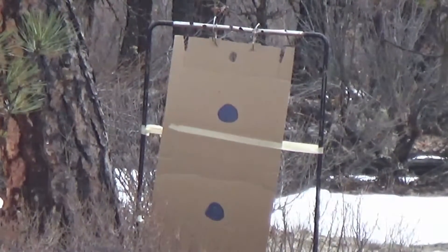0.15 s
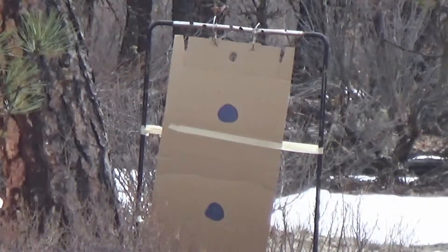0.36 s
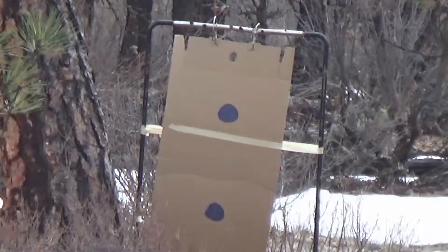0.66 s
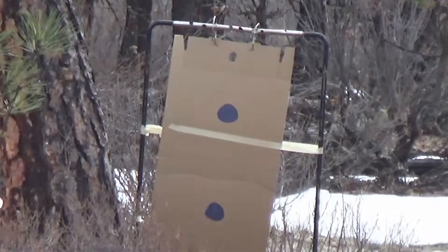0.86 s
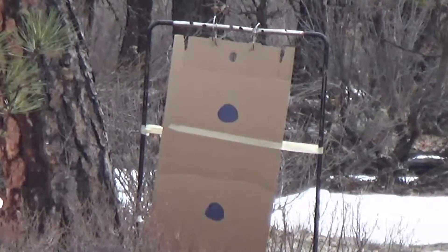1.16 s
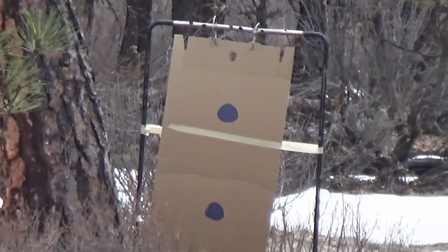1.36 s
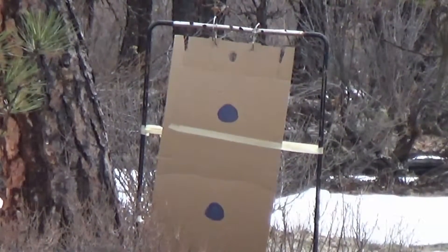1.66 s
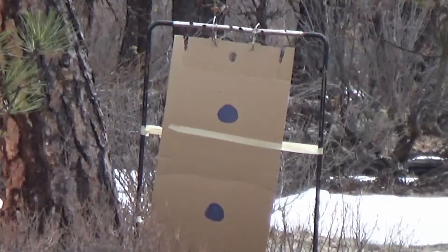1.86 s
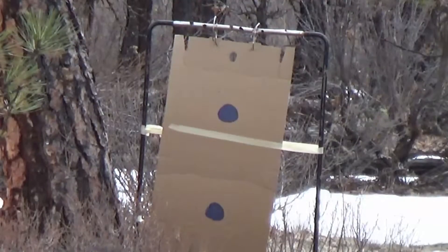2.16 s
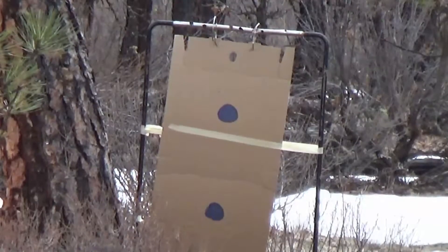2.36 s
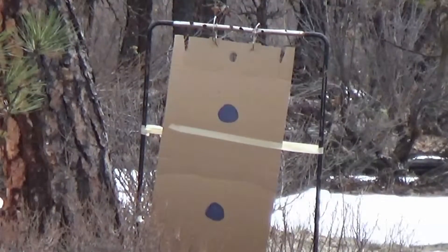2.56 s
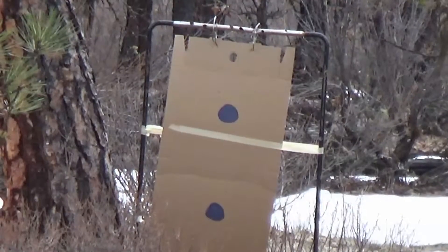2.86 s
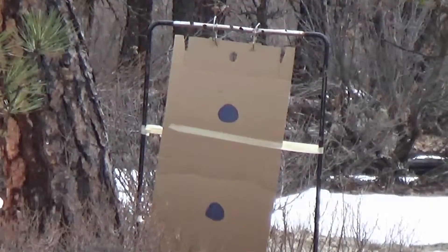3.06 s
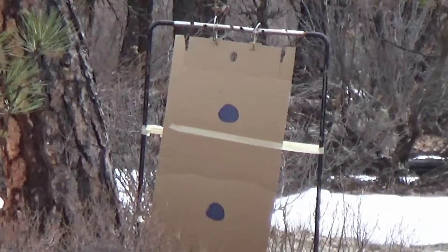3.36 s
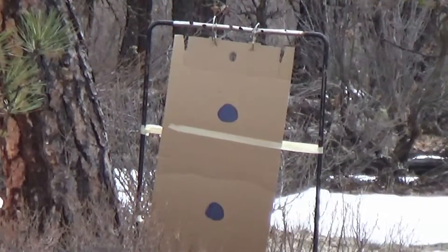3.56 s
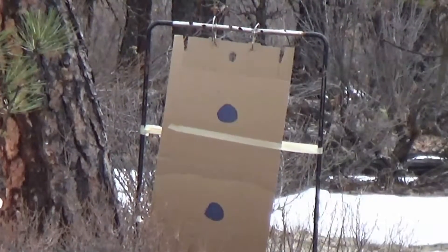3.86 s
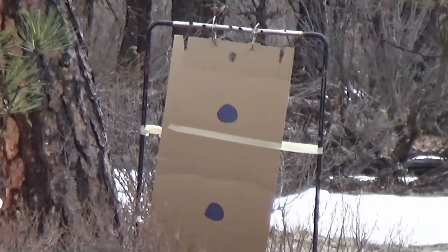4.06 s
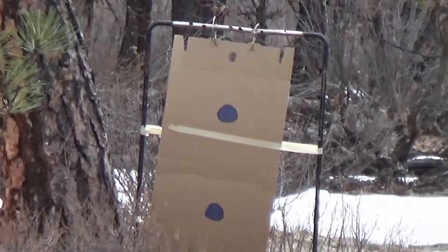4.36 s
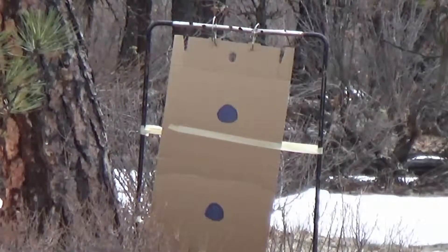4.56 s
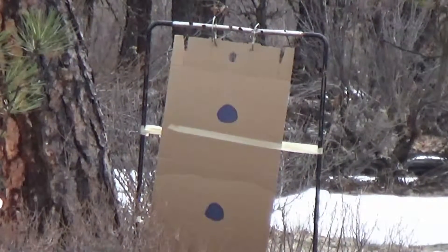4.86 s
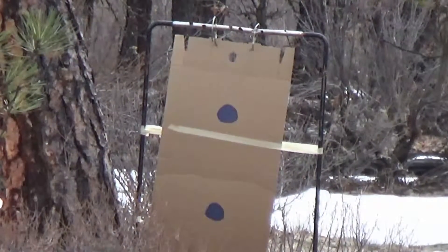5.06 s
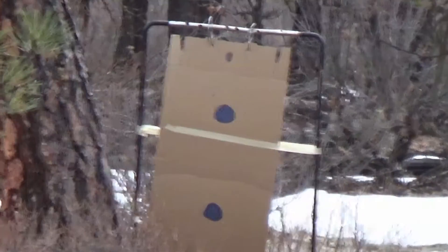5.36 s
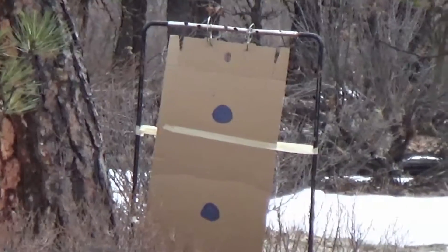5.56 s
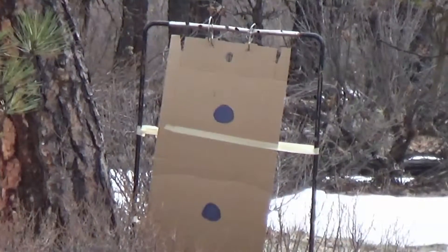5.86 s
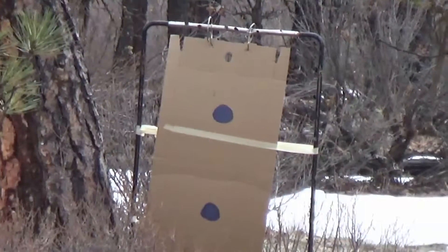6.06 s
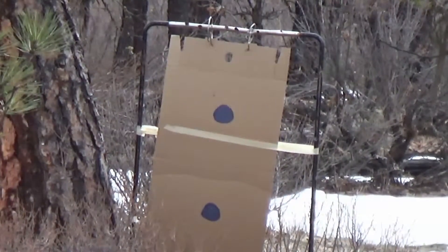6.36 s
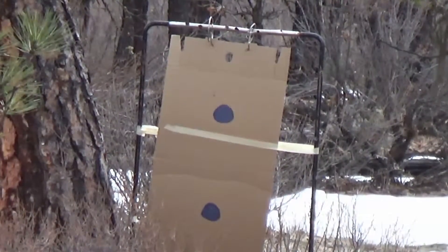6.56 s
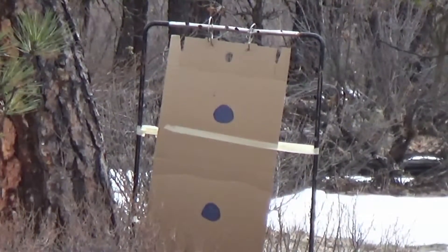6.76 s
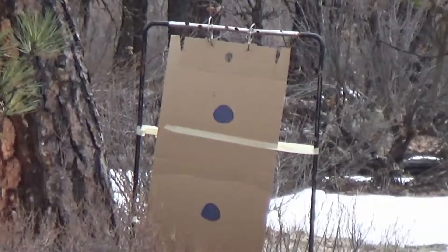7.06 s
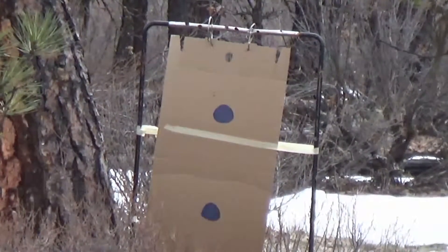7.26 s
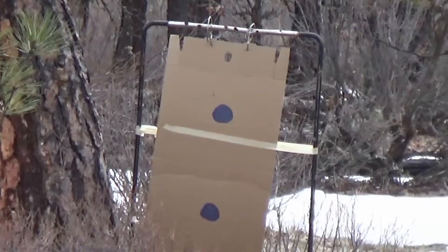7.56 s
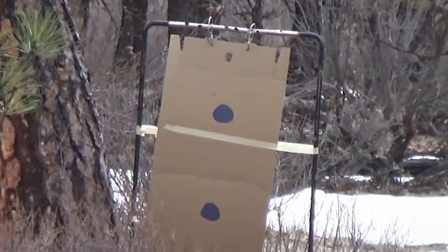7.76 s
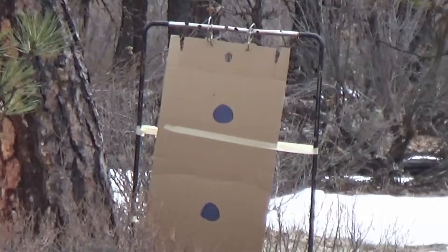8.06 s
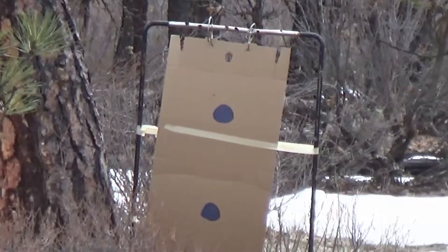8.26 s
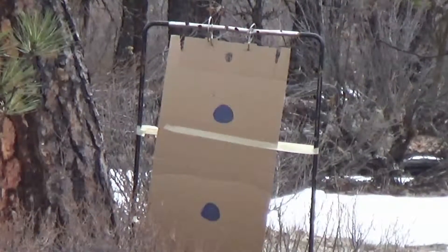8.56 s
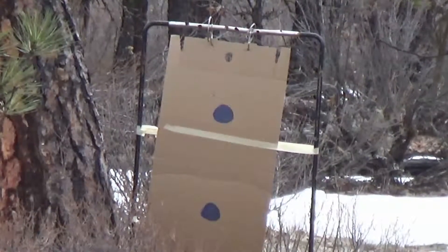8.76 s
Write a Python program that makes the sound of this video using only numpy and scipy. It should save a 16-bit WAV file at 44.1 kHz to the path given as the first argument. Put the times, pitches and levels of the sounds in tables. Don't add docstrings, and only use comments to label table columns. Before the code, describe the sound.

In a quiet snowy pine wood, the tail of a rifle shot fades. Close to the microphone, the stock bumps softly, then the bolt clacks open, scrapes back, throws a ringing brass case and slams shut. After a pause another shot cracks, held down by limiting, its echo rolling through trunks and distant slopes while the bolt is worked again.

```python
import sys
import numpy as np
from scipy import signal
from scipy.fft import rfft, irfft, next_fast_len
from scipy.io import wavfile
from scipy.ndimage import uniform_filter1d

SR = 44100
rng = np.random.default_rng(int(sys.argv[2]) if len(sys.argv) > 2 else 0)


def inscribe(sig):
    pcm = np.round(np.clip(np.atleast_2d(sig).T, -1, 1) * 32767)
    wavfile.write(sys.argv[1], SR, pcm.astype(np.int16))


def attenuation_scalar(level_db):
    decades = np.asarray(level_db, float) / 20
    return 10 ** decades


N = 393813
T = np.arange(N) / SR
STEP = 32
SLOW = T[::STEP]
LONG = next_fast_len(N + STEP, real=True)


def read(table, hz, column=1):
    table = np.array(table, float)
    return np.interp(np.log(hz), np.log(table[:, 0]), table[:, column])


def unit(x):
    return x / np.sqrt(np.mean(x ** 2))


def bell(hz, width):
    return lambda f: -np.minimum(12 * ((f - hz) / width) ** 2, 90)


def noise(db_of_hz, size):
    hz = np.maximum(np.fft.rfftfreq(size, 1 / SR), 1)
    return irfft(rfft(rng.standard_normal(size)) * attenuation_scalar(db_of_hz(hz)), size)


def band(hz, width):
    low, high = max(hz - 2 * width, 0), min(hz + 2 * width, SR / 2)
    bins = np.arange(int(low * LONG / SR), int(high * LONG / SR))
    spectrum = np.zeros(LONG // 2 + 1, complex)
    phases = rng.standard_normal((len(bins), 2)) @ [1, 1j]
    spectrum[bins] = attenuation_scalar(bell(hz, width)(bins * SR / LONG)) * phases
    return unit(irfft(spectrum, LONG)[:N])


def walk(rate):
    k = int(SR / STEP / rate)
    held = np.repeat(rng.standard_normal(len(SLOW) // k + 1), k)
    return uniform_filter1d(uniform_filter1d(held, k), k)[:len(SLOW)]


def bump(s, length):
    return np.exp(-((SLOW - s) / length) ** 2)


def fine(slow):
    return np.interp(T, SLOW, slow)


def add(out, sound, s):
    part = out[int(s * SR):][:len(sound)]
    part += sound[:len(part)]


def ring(t, hz, db, t60):
    return attenuation_scalar(db - 60 * t / t60) * np.sin(2 * np.pi * hz * t)


# t/s, level/dB
SHOTS = [
    (-2.15, 2.2),
    (5.386, 1.5),
]
# f/Hz, level/dB
WOOD = [(80, -77), (160, -45.5), (600, -28.5), (4000, -26), (6000, -36.5), (9000, -26.5), (12500, -25.5),
        (15500, -32)]
# delay/s, f/Hz, width/Hz, length/s, level/dB
BANKS = [(.41, 280, 230, .09, 8), (.34, 6000, 6000, .008, 6), (.27, 7000, 6000, .01, 4),
         (.02, 12000, 6000, .03, 3), (.36, 4200, 2000, .26, 5), (.55, 1700, 400, .12, 3),
         (.435, 3000, 2500, .012, 3.5), (.565, 3000, 3000, .015, 3)]
# f/Hz, level/dB
SLOPES = [(40, -100), (95, -61), (170, -60), (350, -44), (1400, -33), (2500, -33), (4600, -43), (5600, -72)]
BASS_LAG_S, PATCHY_DB = .008, 1.5
HOLD_S = .58
HELD_DB_S, BASS_BUILD_DB_S, BASS_HZ, AIR_DB_S_AT_6K = 4.0, 24, 240, 17
AFTER_DB_S, AFTER_BASS_DB_S, AFTER_BASS_HZ, AFTER_TREBLE_DB_S, AFTER_TREBLE_HZ = 38, 32, 450, 105, 4000
FAR_DB_S, FAR_AIR_DB_S_AT_1K = 10.5, 3.5


def echoes(hz, patch):
    start_db, far_db = read(WOOD, hz), read(SLOPES, hz)
    held_loss = HELD_DB_S - BASS_BUILD_DB_S / (1 + (hz / BASS_HZ) ** 2)
    held_loss += AIR_DB_S_AT_6K * (hz / 6000) ** 1.95
    near_loss = AFTER_DB_S + AFTER_BASS_DB_S / (1 + (hz / AFTER_BASS_HZ) ** 4)
    near_loss += AFTER_TREBLE_DB_S / (1 + (AFTER_TREBLE_HZ / hz) ** 2.5)
    far_loss = FAR_DB_S + FAR_AIR_DB_S_AT_1K * (hz / 1000) ** 1.9
    power = 0
    for s, db in SHOTS:
        age = np.maximum(SLOW - s, 0)
        late = np.maximum(age - HOLD_S, 0)
        banks = sum(g * np.exp(-((age - d) / l) ** 2 - ((hz - f) / w) ** 2) for d, f, w, l, g in BANKS)
        rise = 1 - np.exp(-age / (BASS_LAG_S * (500 / hz) ** .6))
        near = attenuation_scalar(start_db - held_loss * (age - late) - near_loss * late + banks)
        far = attenuation_scalar(far_db - far_loss * late)
        power = power + (near ** 2 + far ** 2) * (rise * attenuation_scalar(db)) ** 2
    return power * attenuation_scalar(PATCHY_DB * (patch + walk(15))) ** 2


# f/Hz, level/dB
WOOD_PAN = [(60, 1.5), (110, 2.5), (200, 2.5), (380, 2.0), (700, 2.0), (1290, 1.0), (2380, 0.0),
            (4400, 0.0), (8120, 0.0), (15000, 0.0)]
# f/Hz, level/dB
WOOD_SIDE = [(60, -10), (110, -10), (200, -10), (380, -9), (700, -7), (1290, -7), (2380, -11), (4400, -8),
             (8120, -11), (15000, -28)]
NARROWS_DB_S, NARROWS_HZ = 19, 5000
# f/Hz, level/dB per Hz
AIR = [(25, -32), (60, -28), (160, -17), (320, -14), (700, -11), (1400, -12), (2500, -14), (4000, -16),
       (6000, -19), (9000, -22), (14000, -27), (16000, -29)]
AIR_DB = -89.5
# f/Hz, level/dB
AIR_SIDE = [(60, -10), (110, -10), (200, -8), (380, -3), (700, -1), (1290, -3), (2380, -4), (4400, -6),
            (8120, -18), (15000, -20)]
# t/s, length/s, treble lift/dB
GUSTS = [
    (1.45, .55, 5),
    (3.4, .5, 3),
    (6.7, .5, -3.5),
    (.5, .6, -1.5),
    (7.7, .4, 1.2),
]
# f/Hz, width/Hz, level/dB
HUM = [
    (990, 40, -78),
    (1210, 60, -78),
    (7900, 150, -82),
]
BANDS = np.append(35 * 2 ** np.arange(.5, 9, .5), 15200)


def wood():
    mid, side, swell, patch = np.zeros(N), np.zeros(N), walk(.7), walk(60)
    breeze_db = sum(db * bump(s, length) for s, length, db in GUSTS)
    narrows = NARROWS_DB_S * np.clip(SLOW - SHOTS[1][0], 0, HOLD_S)
    for hz in BANDS:
        air_db = AIR_DB + read(AIR, hz) + 10 * np.log10(hz) + .8 * swell + .8 * walk(6)
        air = attenuation_scalar(air_db + breeze_db / (1 + (3000 / hz) ** 2)) ** 2
        shot = echoes(hz, patch)
        side_db = read(WOOD_SIDE, hz) - narrows * np.exp(-np.log2(hz / NARROWS_HZ) ** 2)
        wide = air * attenuation_scalar(read(AIR_SIDE, hz)) ** 2 + shot * attenuation_scalar(side_db) ** 2
        lean = np.tanh(read(WOOD_PAN, hz) / 17.4)
        width = min(hz * .36, 2700)
        ahead = band(hz, width) * fine(np.sqrt(air + shot))
        mid += ahead
        side += band(hz, width) * fine(np.sqrt(wide)) + lean * ahead
    drone = sum(band(hz, width) * fine(attenuation_scalar(db + 2.5 * walk(1.5))) for hz, width, db in HUM)
    return attenuation_scalar(1.6) * np.array([mid + side, mid - side]) + drone


# t/s, peak level/dB, f/Hz, upper body level/dB
KNOCKS = [(1.034, -40, 423, 0.5), (1.356, -39, 400, -18), (1.58, -40, 500, -2), (1.909, -50, 200, -4),
          (2.364, -40, 764, -3), (2.42, -47, 200, -6), (2.926, -40, 115, -4), (3.226, -41, 370, -6),
          (3.319, -46, 480, -10), (3.378, -30, 450, -11), (3.383, -40, 200, -14), (2.79, -42, 220, -8),
          (2.858, -42, 220, -8), (3.16, -38, 280, -6), (3.599, -55, 450, -10), (8.05, -38, 600, -5),
          (8.72, -42, 200, -8)]
KNOCK_T60_S = .075


def knocks():
    out, t = np.zeros(N), T[:8192]
    for s, db, hz, upper_db in KNOCKS:
        lower = unit(noise(bell(hz * 1.25, hz * .6), size=len(t)))
        upper = unit(noise(bell(1300, 1600), size=len(t)))
        body = lower + attenuation_scalar(upper_db) * upper
        add(out, body * attenuation_scalar(db - .5 - 60 * t / KNOCK_T60_S) * (1 - np.exp(-t / .003)), s)
    return out


# t/s, length/s, level/dB
SLEEVE = [(1.15, .2, -64), (1.85, .2, -61), (2.4, .09, -57), (3.2, .15, -60), (3.5, .12, -70),
          (8.1, .08, -53)]
SLEEVE_HZ, SLEEVE_WIDTH_HZ = 420, 480


def sleeve():
    rub = sum(attenuation_scalar(db) * bump(s, length) for s, length, db in SLEEVE)
    return band(SLEEVE_HZ, SLEEVE_WIDTH_HZ) * fine(rub * attenuation_scalar(5.0 * walk(35)))


# t/s, peak level/dB, dull minus bright/dB
TICKS = [(1.448, -49, 12), (1.5979, -47, 13), (1.6115, -43, 11), (1.6582, -46, 4), (1.6671, -49, 9),
         (1.7015, -45, 11), (1.7165, -34, 4), (1.8964, -39, 8), (1.9967, -43, 12), (2.0546, -46, -3),
         (2.1085, -35, 2), (2.7014, -41, 6), (2.7109, -38, -3), (2.721, -38, 1.5), (2.749, -35, -1.5),
         (2.8533, -29, 8), (2.9261, -37, 9), (2.970, -30, -2), (2.9853, -33, 7), (3.0467, -46, 3),
         (3.378, -45, 5), (7.2656, -40, 4), (7.312, -50, 5), (7.3838, -41, 8), (7.9106, -37, 11),
         (7.969, -37, 14), (8.0115, -39, 1.5), (8.0345, -36, 6), (8.0756, -29, 9), (8.062, -33, 0.5)]
# t/s, peak level/dB, dull minus
# bright/dB, rebound gap/s, t60/s
STOPS = [(1.6246, -23, 2, .0112, .018), (1.7197, -25, 10, .0072, .022), (1.8356, -16, -11, .0269, .021),
         (2.9734, -19, -5, .0197, .03), (3.1303, -29, -3, .0030, .05), (3.1448, -19, -5, .0030, .018),
         (3.1635, -18, -2, .0045, .05), (7.2412, -31, 2.5, .0064, .02), (7.3969, -22, 6, .0043, .02),
         (7.4951, -16, -12, .0346, .02), (8.7232, -28, 2, .0045, .018), (8.7672, -34, -2, .0035, .02)]
# t/s, peak level/dB, dull minus bright/dB, t60/s
CATCHES = [(2.1365, -30, -6, .06), (2.1445, -20, -1, .02), (2.1494, -19, 0.5, .03), (2.1661, -25, -2, .02),
           (2.1906, -20, -5, .03), (2.2088, -21, -2, .057), (2.2967, -25, 6, .02), (2.769, -29, -5, .05),
           (2.774, -26, -1, .03), (2.7382, -36, 4, .04), (2.693, -46, 0.5, .02), (8.0647, -20, -7, .035),
           (8.0965, -20, -6, .03), (8.1137, -25, 3, .043), (8.2058, -28, -3, .021), (8.7705, -30, -3, .015),
           (8.067, -20, -3, .02), (8.8834, -19, -3, .055), (8.9, -21, -4, .024), (8.9195, -28, 6, .035)]
# t/s, peak level/dB, first gap/s, t60/s
REAR = [
    (2.2504, -21, .0085, .05),
    (8.153, -20, .0112, .03),
]
# t/s, peak level/dB, dull minus bright/dB, t60/s
FEED = [(2.7795, -22, 2, .03), (2.783, -20, 3, .055), (2.7965, -21, 1, .05), (2.811, -27, -2, .03),
        (2.822, -24, -1, .035), (2.8265, -22, -5, .05), (2.8375, -21, -4, .022), (2.8609, -21, -8, .02),
        (2.8645, -18, -9, .045), (8.8157, -33, -2, .04), (8.8232, -25, -3, .025), (8.8267, -24, 1, .04),
        (8.8326, -23, 3, .05), (8.84, -21, 2, .055), (8.851, -21, -4, .03), (8.8565, -21, -3, .02),
        (8.863, -24, -5, .025), (8.868, -25, -3, .025)]
TICK_T60_S, GAP_SHRINK, REAR_DULL_DB = .028, .78, -4
REBOUND_DB, REBOUND_DB_PER_S, REBOUND_DULL_DB, REBOUND_T60_S = -4, -330, -3, .03


def contacts():
    rows = [(s, db, dull, t60) for s, db, dull, gap, t60 in STOPS] + CATCHES
    for s, db, dull, gap, t60 in STOPS:
        rebound_db = db + REBOUND_DB + REBOUND_DB_PER_S * gap
        rows += [(s + gap, rebound_db, REBOUND_DULL_DB, REBOUND_T60_S)]
    rows += [(*tick, TICK_T60_S) for tick in TICKS]
    for s, db, gap, t60 in REAR:
        for k in range(4):
            delay = gap * (1 - GAP_SHRINK ** k) / (1 - GAP_SHRINK)
            rows += [(s + delay, db, REAR_DULL_DB, t60)]
    return rows + FEED


# f/Hz, level/dB per Hz
STEEL = [(60, -50), (200, -23), (550, -6.5), (1700, -2), (4000, -2), (5800, -9), (7000, -4.5), (11500, 0.5),
         (15500, -5), (16500, -30)]
# f/Hz, level/dB, t60/s
RECEIVER = [(1750, -12, .012), (2700, -18, .008), (3900, -15, .01), (7400, -12, .008), (8900, -12, .008),
            (11800, -11, .008)]
ATTACK_S, PATCH_HZ, PATCH_DB = .0007, 1100, 3.2
FALL_DB, FALL_SHAPE = 130, 1.4


def impacts():
    out, t = np.zeros(N), T[:3072]
    places = np.arange(0, SR / 2, PATCH_HZ)
    for s, db, dull_db, t60 in contacts():
        patches = PATCH_DB * rng.standard_normal(size=64)[:len(places)]

        def colour(f):
            dull = (dull_db + 2.0) / (1 + (f / 5800) ** 8)
            return read(STEEL, f) + dull + np.interp(f, places, patches)

        fall = attenuation_scalar(-FALL_DB * (t / max(t60, .005)) ** FALL_SHAPE)
        scrape = unit(noise(colour, size=len(t))) * fall * (1 - np.exp(-(t / ATTACK_S) ** 2))
        modes = 0
        for hz, mode_db, mode_t60 in RECEIVER:
            detune, lift = rng.standard_normal(2)
            modes = modes + ring(t, hz * (1 + .08 * detune), colour(hz) + mode_db + 3.5 * lift, mode_t60)
        hit = scrape + modes * (1 - np.exp(-t / ATTACK_S))
        add(out, attenuation_scalar(db - 1.5) * hit / np.std(hit[t < .003]), s - .0005)
    return out


# t/s, length/s, f/Hz, width/Hz, level/dB
SQUEAKS = [(2.815, .015, 6200, 120, -36), (2.786, .008, 3700, 200, -30), (3.152, .008, 4000, 150, -32),
           (2.155, .015, 1400, 250, -34), (8.075, .015, 1400, 300, -36), (8.845, .03, 2800, 300, -34),
           (1.628, .004, 3500, 400, -36), (1.724, .007, 1500, 350, -33), (1.842, .008, 1900, 300, -34),
           (7.401, .006, 1750, 250, -32), (7.499, .005, 1900, 300, -33), (1.845, .012, 600, 500, -44),
           (3.17, .008, 750, 400, -41), (3.149, .005, 13500, 1200, -30), (1.837, .002, 12500, 2500, -24),
           (7.4965, .0015, 12000, 3000, -24), (8.166, .002, 11200, 500, -27)]


def squeaks():
    return sum(band(hz, width) * fine(attenuation_scalar(db) * bump(s, length)) for s, length, hz, width, db in SQUEAKS)


SWELL_DB, EASE_DB = 16, 20


def pressure(s, swell, ease, db):
    age = SLOW - s - swell
    shape_db = np.where(age < 0, SWELL_DB * age / swell, -EASE_DB * age / ease)
    return attenuation_scalar(db + shape_db) * (age > -swell) * (age < ease)


# t/s, swell/s, ease/s, level/dB, dull minus bright/dB
STROKES = [(1.833, .004, .14, -37, 0.5), (2.09, .07, .04, -39, 3), (2.19, .08, .09, -36, 8),
           (2.71, .06, .03, -38, 2), (2.3, .035, .17, -45, 5), (2.78, .05, .1, -37, 1.5),
           (3.165, .01, .1, -39, -1.5), (7.493, .004, .13, -40, 1.5), (8.01, .055, .08, -36, 7),
           (8.11, .07, .035, -34, 1.5), (8.77, .07, .04, -34, 7), (8.87, .025, .09, -42, 1.5)]


def drag():
    out = np.zeros(N)
    for bright in (0, 1):
        def part(f):
            above = 1 / (1 + (5800 / f) ** 8)
            return read(STEEL, f) + 20 * np.log10(abs(1 - bright - above) + 1e-4)

        grit = unit(noise(part, size=LONG))[:N] * fine(attenuation_scalar(6.5 * walk(400) + 4.0 * walk(80)))
        force = sum(pressure(s, swell, ease, db - 3 + dull_db * (.5 - bright))
                    for s, swell, ease, db, dull_db in STROKES)
        out += grit * fine(uniform_filter1d(force, size=6))
    return out


def bolt():
    return impacts() + squeaks() + drag()


# t/s, length/s, level/dB
GRIP = [(2.15, .04, -66), (2.3, .05, -64), (2.42, .03, -64), (2.85, .04, -64), (3.05, .05, -63),
        (3.2, .07, -60), (3.39, .03, -60)]
GRIP_HZ, GRIP_WIDTH_HZ = 170, 110


def grip():
    rub = sum(attenuation_scalar(db) * bump(s, length) for s, length, db in GRIP)
    return band(GRIP_HZ, GRIP_WIDTH_HZ) * fine(rub * attenuation_scalar(3.0 * walk(30)))


# t/s, level/dB, spin f/Hz, first
# turned away/s, t60/s
CASE = [
    [(2.272, -34, 40, .015, .1), (2.289, -32.5, 25, .029, .3), (3.085, -60, 20, .03, .3),
     (8.19, -33, 20, .03, .07), (8.206, -22, 26, .038, .17), (8.734, -35, 22, .048, .2),
     (8.738, -34, 30, .02, .06)],
    [(2.251, -27, 110, .004, .1), (2.259, -24, 90, .008, .06), (2.272, -28, 60, .02, .12),
     (2.297, -28.5, 26, .024, .24), (8.152, -20, 60, .012, .06), (8.165, -25, 60, .012, .04),
     (8.188, -31, 60, .015, .1), (8.206, -15.5, 42, .016, .14), (8.732, -34, 45, .004, .15),
     (8.737, -29, 35, .012, .12)],
]
# low f/Hz, high f/Hz
BRASS = [
    (9768, 13494),
    (9812, 13542),
]
SPIN_DEPTH = [.45, .85]


def case():
    out, t = np.zeros(N), T[:16384]
    for mode, strikes in enumerate(CASE):
        for s, db, spin_hz, away, t60 in strikes:
            facing = 1 - SPIN_DEPTH[mode] * np.cos(2 * np.pi * spin_hz * (t - away))
            hz = BRASS[int(s > SHOTS[1][0])][mode]
            add(out, ring(t, hz, db, t60) * facing * (1 - np.exp(-t / .0005)), s)
    return out


# f/Hz, level/dB, t60/s
BARREL = [(5755, -52, 5.0), (6896, -55, 5.0), (10024, -59, 3.0), (14115, -40, 1.5)]
CRACK_LEAD_S, CRACK_DB = .0065, -22


def barrel():
    out, s, t = np.zeros(N), SHOTS[1][0], T[:512]
    shape = np.exp(-((t - .0015) / .002) ** 4) + .2 * np.exp(-t / .006)
    crack = attenuation_scalar(CRACK_DB) * unit(noise(bell(6000, 16000), size=len(t))) * shape
    add(out, crack, s - CRACK_LEAD_S)
    t = T[:2 * SR]
    add(out, sum(ring(t, *mode) for mode in BARREL) * np.minimum(t / HOLD_S, 1) ** 2, s)
    return out


# f/Hz, level/dB
RIFLE_PAN = [(60, 0.0), (110, -1.0), (200, -0.5), (380, -1.0), (700, -4.0), (1290, -7.5), (2380, -7.0),
             (4400, -6.5), (8120, 1.0), (15000, 0.5)]
# f/Hz, phase/rad
RIFLE_LEAD = [(0, 0), (2240, 1.0), (2670, 0.7), (3190, 1.0), (3880, 0.5), (4390, 1.6), (5340, 1.5),
              (5940, 2.4), (6720, 0.6), (7670, 0.9), (8440, 0.7), (9820, 0.4), (10600, 0.3), (16200, -0.0)]
# delay/s, level/dB
ANSWER = [(0, -22), (.03, -29), (.05, -32), (.065, -27), (.09, -33), (.2, -55)]


def nearby(x):
    hz = np.maximum(np.fft.rfftfreq(LONG, 1 / SR), 1)
    ratio = attenuation_scalar(read(RIFLE_PAN, hz)) * np.exp(1j * np.interp(hz, *np.transpose(RIFLE_LEAD)))
    side = irfft(rfft(x, LONG) * (ratio - 1) / (ratio + 1), LONG)[:N]
    t = T[:8192]
    dull = lambda f: -np.log2(1 + (f / 8000) ** 2) * 3.0
    fade = attenuation_scalar(np.interp(t, *np.transpose(ANSWER)) - 27)
    answer = [unit(noise(dull, size=len(t))) * fade for _ in range(2)]
    wet_mid, wet_side = (signal.oaconvolve(x, a)[:N] for a in answer)
    wet_side = signal.lfilter([1.2], [1, -.1], wet_side)
    return x + wet_mid + np.array([[1], [-1]]) * (side + wet_side)


def thin(x, hz):
    return signal.sosfilt(signal.butter(2, hz, "high", fs=SR, output="sos"), x)


def scene():
    near = thin(bolt() + case() + sleeve(), 200) + thin(knocks() + grip(), 90)
    return nearby(near) + thin(barrel(), 250) + wood()


def band_limit(x):
    return signal.sosfilt(signal.butter(12, 16650, fs=SR, output="sos"), x)


CEILING_DB, SMOOTH_S = -16, .012


def record(dry):
    power = uniform_filter1d(np.mean(dry ** 2, axis=0), int(SMOOTH_S * SR))
    held = dry / (1 + (power / attenuation_scalar(CEILING_DB + 3) ** 2) ** 2) ** .25
    held = signal.sosfilt(signal.ellip(6, .3, 40, 15800, fs=SR, output="sos"), held)
    return band_limit(held)


dry = scene()
out = record(dry)
inscribe(out)
```